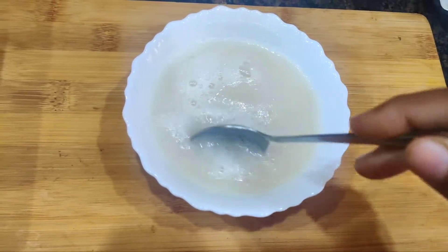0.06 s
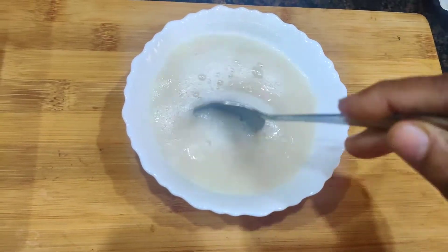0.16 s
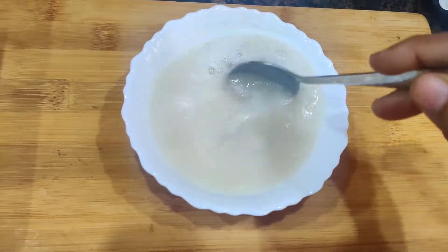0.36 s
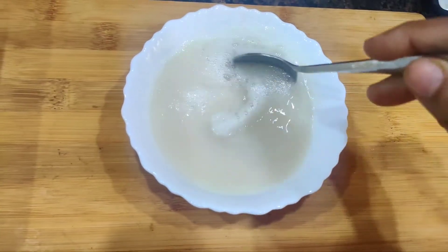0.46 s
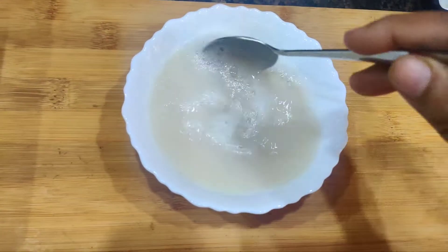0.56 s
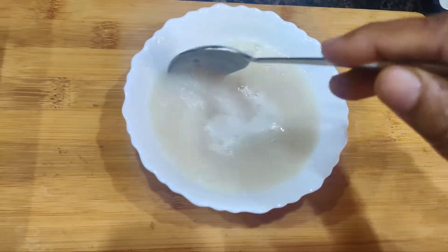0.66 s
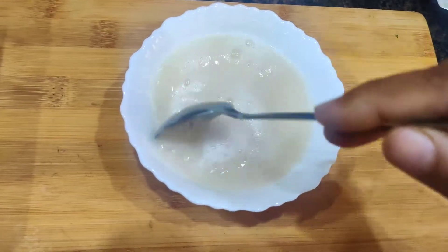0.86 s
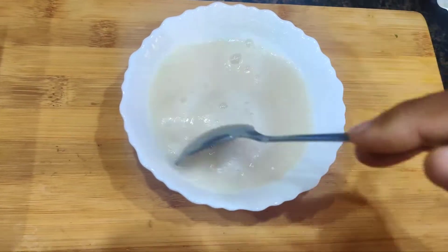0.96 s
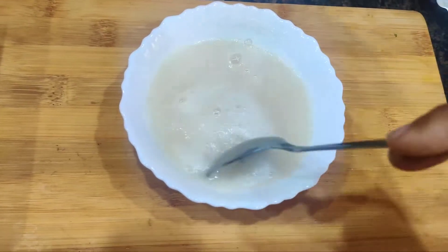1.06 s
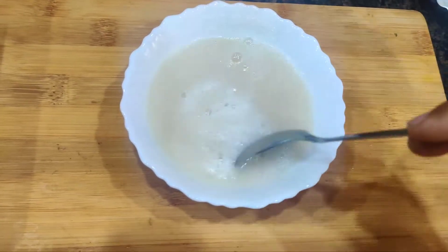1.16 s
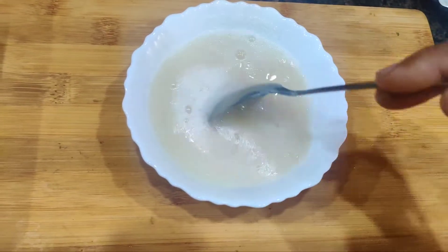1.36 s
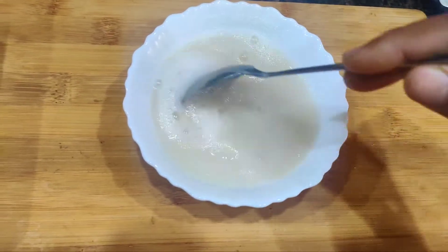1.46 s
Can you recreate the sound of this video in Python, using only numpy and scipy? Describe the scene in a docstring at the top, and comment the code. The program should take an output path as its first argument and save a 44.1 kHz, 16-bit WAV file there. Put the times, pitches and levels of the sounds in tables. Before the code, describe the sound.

A steel spoon clinks sharply on a ceramic bowl, then taps and scrapes softly while stirring.

```python
"""In a small kitchen, heard through two unlike microphones, a steel spoon stirs a thin frothy batter in a
ceramic bowl: one sharp clink, a few softer taps and short scrapes. The liquid damps the ring.
Taps are noise cracks plus ringing modes; scrapes are many tiny catches on the same bowl; thuds are dull bursts.
The room answers with close reflections and a diffuse tail, the air is banded noise, and an appliance hums
low in wavering sines, the upper ones of which stop."""
import sys
import numpy as np
from scipy import signal
from scipy.io import wavfile

SR = 44100
rng = np.random.default_rng(int(sys.argv[2]) if len(sys.argv) > 2 else 0)


def voltage_ratio(level):
    """Linear amplitude factor for a level in decibels (scalar or array-like)."""
    return 10 ** (np.asarray(level, float) / 20)


def wav_out(sig):
    """Save sig, one row per channel (or a flat mono array), as 16-bit PCM at SR to the path in sys.argv[1]."""
    wavfile.write(sys.argv[1], SR, np.round(np.clip(np.atleast_2d(sig).T, -1, 1) * 32767).astype(np.int16))


N = 66150  # samples, 1.5 s

# Appliance hum. Each row: tone [Hz], level [dB], time it stops [s].
HUM_TONES = [(102, -71, 1.6), (213, -76, .9), (296, -78, 1), (426, -79, 0.91)]
# Room noise spectrum. Each row: frequency [Hz], relative density [dB per Hz].
AIR_SPECTRUM = [(12, -31), (20, 3.5), (37, 4), (64, -7), (92, -3), (180, -11.5), (207, -11.5), (245, -16),
                (289, -9.5), (352, -16.5), (416, -8.5), (505, -18.5), (549, -17.5), (958, -19.5),
                (1040, -23.5), (1870, -24.5), (2680, -30.5), (5850, -26), (6540, -33.5), (7950, -30),
                (15500, -39)]
# How alike the room noise is at both microphones. Each row: frequency [Hz], likeness [0 to 1].
AIR_LIKENESS = [(25, 1), (100, 0.99), (250, 0.92), (500, 0.23), (1500, .2), (5000, 0.093), (15000, .05)]
# Lean of the room noise. Each row: frequency [Hz], left minus right [dB].
AIR_LEAN = [(25, -2.6), (300, 0.6), (1000, 0.5), (2400, 2.5), (5000, 6), (9000, -7), (15000, 4)]
# Course of the room noise at 200-900 Hz, counted against its end. Each row: time [s], level [dB].
MURMUR_COURSE = [(0.0, -69.5), (0.73, -72), (0.834, -70), (1.04, -72), (1.236, -73), (1.5, -72.5)]
# Colour of the kitchen's answer, fuller between the rings. Each row: centre [Hz], width [Hz], gain [dB].
KITCHEN_COLOUR = [(2000, 500, 1.5), (3700, 1100, 5), (5500, 800, 0.5), (6200, 460, 4), (7320, 1100, -1.5),
                  (8900, 1800, 9), (12900, 5100, 8.5)]
# Microphone resonances, left then right. Each row: centre [Hz], width [Hz], gain [dB].
LEFT_RESONANCES = [(2470, 1310, 10), (5735, 2780, 12), (9250, 4200, -20.5), (12400, 5100, -9)]
RIGHT_RESONANCES = [(2480, 6000, -5.5), (5430, 4600, -4.5), (8880, 610, 5), (12900, 3800, 8.5)]
# Liquid sloshes and the bowl thuds on the board. Each row: start [s], slosh level [dB],
# fall to 1/e [s], top of the slosh [Hz], board boom level [dB].
SLOSH_THUDS = [(0.2362, -53.5, 0.037, 1320, -54.5), (0.843, -61.5, 0.021, 1285, -71.5),
               (0.895, -59, 0.057, 453, -68.5)]
# Board under the bowl. Each row: resonance [Hz], width [Hz], relative level [dB].
BOARD_MODES = [(291, 67, -7.5), (480, 63, -2)]
# Spoon dragging on the glaze, before room and microphones. Each row: time [s], level [dB].
DRAG_COURSE = [(0, -89), (.17, -105), (.2, -72), (.235, -88.5), (.26, -84.5), (.84, -84.5), (.87, -67.5),
               (.92, -68.5), (.945, -76), (.965, -70.5), (1.0, -70), (1.02, -74), (1.045, -67.5),
               (1.068, -78), (1.085, -63.5), (1.13, -73.5), (1.15, -72.5), (1.165, -85.5), (1.25, -79.5),
               (1.3, -81), (1.38, -90), (1.42, -80), (1.5, -89)]
# Lowest ring while dragging, one row: pitch [Hz], relative level [dB], t60 before damping [s].
DRAG_LOWEST_RING = (2650, 0.1018, 0.02)
# Other modes of bowl and spoon. Each row: pitch [Hz], level against the lowest ring [dB], t60 undamped [s].
BOWL_MODES = [(2330, -1, 0.039), (2605, -3.5, 0.026), (2888, -11, 0.04), (3234, -15.5, 0.049),
              (3520, -15.5, 0.033), (4000, -18.5, 0.053), (4380, -21, 0.025), (4750, -7, 0.041),
              (5200, -16.5, 0.0087), (5730, -15.5, 0.039), (5935, -2, 0.02), (7150, -10, 0.057),
              (9140, -18.5, 0.02), (9600, -19, 0.017), (9680, -21, 0.073)]
# Spoon meets bowl, before room and microphones. Each row: start [s], crack level [dB],
# brightness [dB per octave], lowest ring [Hz], ring level [dB], t60 of the lowest ring [s], contact [s].
SPOON_TAPS = [(-.06, -30, -3.7, 2000, -46.5, 0.11, 0.0039), (0.204, -59.5, -2.5, 2300, -105, 0.014, 0.0015),
              (0.213, -65, -7, 2353, -64, 0.021, 0.0049), (0.2376, -22.5, 0.43, 1980, -34, 0.06, 0.0021),
              (0.4915, -59, -5.5, 2520, -55.5, 0.1, 0.0011), (0.4924, -46, -6, 2306, -54.5, 0.03, 0.0029),
              (0.8447, -48.5, 3, 2663, -39.5, 0.034, 0.0022), (0.8934, -59, 1.8, 2625, -52, 0.15, 0.0036),
              (0.8983, -69, 4.5, 2607, -62.5, 0.095, 0.0036), (0.9095, -62.5, 5, 2697, -66, 0.097, 0.0018),
              (1.0292, -63.5, -5, 2730, -58.5, 0.048, 0.0033), (1.0745, -64.5, 5, 2370, -81, 0.033, 0.002),
              (1.0923, -53, -11, 2720, -53, 0.028, 0.0036), (1.119, -71, 1, 2730, -62, 0.044, 0.0069),
              (1.141, -64, -28, 2830, -55, 0.038, 0.0055), (1.2013, -56.5, -14, 2580, -57, 0.029, 0.0033),
              (1.2049, -66.5, -11.5, 2254, -54, 0.058, 0.0013),
              (1.2096, -67, -20, 3310, -55.5, 0.04, 0.00235), (1.23, -64, -16, 2660, -64, 0.017, 0.0018),
              (1.2339, -74, -10, 2720, -66, 0.019, 0.0017), (1.241, -68.5, -9, 2840, -66, 0.02, 0.002)]
# Crack by bands, each with a wash of dense short rings. Each row: low edge [Hz], high edge [Hz],
# band level [dB], wash against the crack [dB], t60 of the wash [s].
CRACK_BANDS = [(1797, 2202, -5, -8.5, 0.044), (2300, 2900, -0.5, -19.5, 0.048),
               (3000, 4600, -9.5, -17.5, 0.018), (3673, 4400, -8.5, -20.5, 0.066),
               (4564, 4900, -7, -6, 0.055), (5460, 6500, -2, -14, 0.051), (6400, 11000, -22.5, -14, 0.059),
               (8500, 9500, -6.5, -6, 0.056), (9900, 15500, -21, -10.5, 0.067)]

HUM_WAVER_DB, AIR_DB = 1, -63.5
EARLY_DB, EARLY_T60_S, LATE_DB, LATE_T60_S, WALL_CUT_HZ = -17.5, 0.041, -25, 0.43, 22000
RIGHT_LEAD_S = 0.0002  # the bowl reaches the right microphone first
LEAD_S = 0.1  # the bowl is already sounding this long before the start
BOWL_LOW_CUT_HZ = 1830
TILT_FROM_HZ = 2500  # brightness tilts about this frequency
GRAINS_PER_S, GRAIN_SPREAD_DB = 1700, 3.5
DRAG_DAMPING = 0.68  # share of the ring length left while steel rests on glaze
DRAG_TILT_DB, DRAG_DETUNE = -1.5, 0.04  # dB per octave; widest pitch shift as the contact point moves
STRENGTH_SPREAD_DB = 2  # chance strength of each mode
CUT_UNDER_RING = 0.88  # the tap is cut below this share of its lowest ring
TOP_STOP_HZ = 15600


def rms_one(x):
    """Scale to rms 1."""
    return x / np.sqrt(np.mean(x ** 2) + 1e-20)


def at_hz(points, hz):
    """Read a spectrum table along log frequency."""
    table = np.array(points)
    return np.interp(np.log(hz), np.log(table[:, 0]), table[:, 1])


def in_time(rows, t):
    """Read a time curve."""
    return np.interp(t, *np.transpose(rows))


def band_pass(x, order, low, high):
    """Keep the sound between two frequencies."""
    return signal.sosfilt(signal.butter(order, [low, high], "band", fs=SR, output="sos"), x)


def high_pass(x, order, hz):
    """Cut the sound below a frequency."""
    return signal.sosfilt(signal.butter(order, hz, "high", fs=SR, output="sos"), x)


def drift(rate_hz):
    """Slow random wander of spread 1: low-passed noise at every 40th sample, joined by lines."""
    r = np.exp(-80 * np.pi * rate_hz / SR)
    slow = signal.lfilter([1], [1, -2 * r, r * r], rng.standard_normal(N // 40 + 2002))[2000:]
    return np.interp(np.arange(N) / 40, np.arange(len(slow)), rms_one(slow))


def ring(clicks, hz, t60):
    """A damped resonator: each unit click sets a sine of height 1 ringing."""
    r, w = voltage_ratio(-60 / (t60 * SR)), 2 * np.pi * hz / SR
    return signal.lfilter([0, np.sin(w)], [1, -2 * r * np.cos(w), r * r], clicks + 1e-18)


def peaks(x, table):
    """Chain of peaking filters, one for each resonance or dip."""
    for hz, width, db in table:
        w, g = 2 * np.pi * hz / SR, voltage_ratio(db / 2)
        q = np.sin(w) * width / hz / 2
        x = signal.lfilter([1 + q * g, -2 * np.cos(w), 1 - q * g],
                           [1 + q / g, -2 * np.cos(w), 1 - q / g], x)
    return x


def hum():
    """Low appliance tones as sines that waver in level; the upper ones fade out in 84 ms."""
    t = np.arange(N) / SR
    out = 0
    for hz, db, stop in HUM_TONES:
        level = np.sqrt(2) * voltage_ratio(db + HUM_WAVER_DB * drift(4))
        tone = np.sin(2 * np.pi * (hz * t + rng.random()))
        out = out + level * tone * np.clip((stop - t) / 0.084, 0, 1)
    return out


def air():
    """Room noise in bands of 0.3 octave, each with its own level, wander, likeness and lean."""
    out, edges = 0, 18 * 2 ** np.arange(0, 10, 0.3)
    white = rng.standard_normal((2, 2, N + 4000))  # neighbouring bands take turns
    murmur = in_time(MURMUR_COURSE, np.arange(N) / SR)
    for k, (low, high) in enumerate(zip(edges, edges[1:])):
        mid, side = band_pass(white[k % 2], 2, low, high)[:, -N:]
        hz = np.sqrt(low * high)
        alike = np.clip(at_hz(AIR_LIKENESS, hz), -1, 1)
        half_lean_db = at_hz(AIR_LEAN, hz) / 2
        db = at_hz(AIR_SPECTRUM, hz) + 1.8 * drift(8)
        if 200 < hz < 900:
            db = db + murmur - murmur[-1]
        stereo = np.sqrt(1 + alike) * mid + np.sqrt(1 - alike) * side * [[1], [-1]]
        out = out + voltage_ratio(db) * voltage_ratio(np.array([[half_lean_db], [-half_lean_db]])) * stereo
    return voltage_ratio(AIR_DB) * rms_one(out)


def kitchen(x):
    """Direct sound, close reflections and a diffuse tail of decaying noise, unlike at each side."""
    t = np.arange(SR // 2) / SR
    wall = signal.butter(1, WALL_CUT_HZ, fs=SR, output="sos")
    sides = []
    for _ in range(2):
        echo = 0
        for db, t60, gap in [(EARLY_DB, EARLY_T60_S, 0.002), (LATE_DB, LATE_T60_S, 0.008)]:
            noise = signal.sosfilt(wall, rng.standard_normal(len(t)))
            tail = noise * voltage_ratio(-60 * t / t60) * (t > gap)
            echo = echo + voltage_ratio(db) * tail / np.sqrt(np.sum(tail ** 2))
        sides.append(x + signal.fftconvolve(x, peaks(echo, KITCHEN_COLOUR))[:len(x)])
    return sides


def thuds():
    """Dull low noise bursts that swell fast and die, with the resonant boom of the board."""
    out, t = 0, np.arange(N) / SR
    for s, db, length, top_hz, board_db in SLOSH_THUDS:
        u = np.maximum(t - s, 0) / length
        noise = 0.5 * rng.standard_normal((2, N)) + rng.standard_normal(N)  # mostly common to both sides
        dull = rms_one(band_pass(noise, 2, 200, top_hz))
        boom = 0
        for hz, width, mode_db in BOARD_MODES:
            boom = boom + voltage_ratio(mode_db) * rms_one(band_pass(noise, 1, hz - width / 2, hz + width / 2))
        swell = np.minimum(8 * u, 1) * np.exp(-u)
        out = out + (voltage_ratio(db) * dull + voltage_ratio(board_db) * boom) * swell
    return out


def drag(size):
    """Small catches of steel on glaze excite the bowl's modes, detuned as the contact moves."""
    catches = rng.random(size) < GRAINS_PER_S / SR
    strength = voltage_ratio(GRAIN_SPREAD_DB * np.minimum(rng.exponential(1, size), 2))
    grains = catches * strength * rng.choice([-1, 1], size)
    place = rng.integers(0, 5, size)  # each catch falls to one of five contact points
    body = 0
    for hz, db, t60 in [DRAG_LOWEST_RING] + BOWL_MODES[2:]:
        level = voltage_ratio(db + DRAG_TILT_DB * np.log2(hz / TILT_FROM_HZ))
        for k in range(5):
            pitch = hz * (1 + DRAG_DETUNE * (k - 2) / 2)
            body = body + level * ring(grains * (place == k), pitch, t60 * DRAG_DAMPING)
    return voltage_ratio(in_time(DRAG_COURSE, np.arange(size) / SR - LEAD_S)) * rms_one(body)


def taps(size):
    """Each contact is a brief chatter that cracks, leaves a wash and strikes the modes from its lowest up."""
    out, span = np.zeros(size + SR), SR // 4
    t = np.arange(span) / SR
    for s, db, tilt_db, low_hz, ring_db, low_t60, contact in SPOON_TAPS:
        noise, spread = rng.standard_normal((2, span + 300)), rng.standard_normal(20)
        touch = np.sqrt(np.sin(np.pi * np.minimum(t / contact, 1)) + 1e-12)
        hit = 0
        for k, (low, high, band_db, wash_db, t60) in enumerate(CRACK_BANDS):
            band = rms_one(band_pass(noise[k % 2], 2, low, high)[-span:])
            crack = band * touch
            crack = crack / np.sqrt(np.mean(crack[t < contact] ** 2))
            wash = band * np.minimum(t / contact, 1) * voltage_ratio(wash_db - 60 * t / t60)
            hit = hit + voltage_ratio(db + band_db + tilt_db * np.log2(high / TILT_FROM_HZ)) * (crack + wash)
        hit = high_pass(hit, 6, CUT_UNDER_RING * low_hz)
        chatter = noise[0, :span] * touch
        chatter = chatter / np.sqrt(np.sum(chatter ** 2))
        for k, (hz, mode_db, t60) in enumerate([(low_hz, 0, low_t60)] + BOWL_MODES):
            if k > 0 and hz <= 1.07 * low_hz:
                continue  # only modes above the lowest ring sound
            # evens out how strongly this chatter happens to drive the pitch
            drive = max(abs(chatter @ np.exp(-2j * np.pi * hz * t)), 0.5)
            level_db = ring_db + mode_db + tilt_db * np.log2(hz / TILT_FROM_HZ)
            level_db += STRENGTH_SPREAD_DB * spread[k] * (k > 0)
            hit += voltage_ratio(level_db) / drive * ring(chatter, hz, t60)
        i = int((s + LEAD_S) * SR)
        out[i:i + span] += hit
    return out[:size]


def microphones(left, right, lead):
    """Each side gets its own resonances; the right one hears the bowl a little sooner."""
    n = np.arange(N) + lead
    near_left = peaks(left, LEFT_RESONANCES)[n]
    near_right = np.interp(n + round(RIGHT_LEAD_S * SR), np.arange(N + lead), peaks(right, RIGHT_RESONANCES))
    return np.array([near_left, near_right])


def scene():
    """Taps and scrapes through room and microphones, over thuds, air and hum."""
    lead = int(LEAD_S * SR)
    spoon = high_pass(taps(N + lead) + drag(N + lead), 7, BOWL_LOW_CUT_HZ)
    left, right = kitchen(spoon)
    return microphones(left, right, lead) + thuds() + air() + hum()


def roll_off(x):
    """The treble ends steeply here."""
    return signal.sosfilt(signal.butter(12, 16440, fs=SR, output="sos"), x)


def record(dry):
    """A steep low-pass takes off the top, 40 dB down from its stop edge."""
    top_cut = signal.cheby2(10, 40, TOP_STOP_HZ, fs=SR, output="sos")
    mix = signal.sosfilt(top_cut, dry)
    return roll_off(mix)


dry = scene()
out = record(dry)
wav_out(out)
```